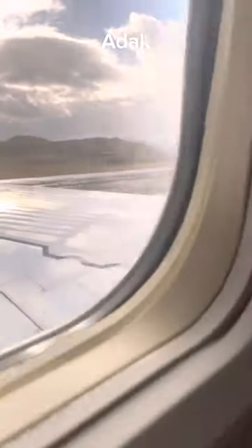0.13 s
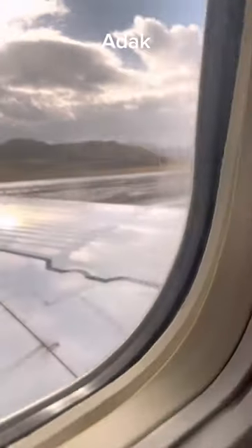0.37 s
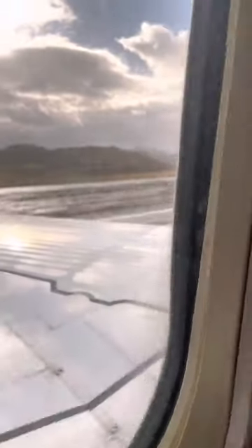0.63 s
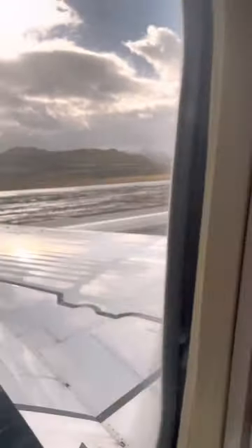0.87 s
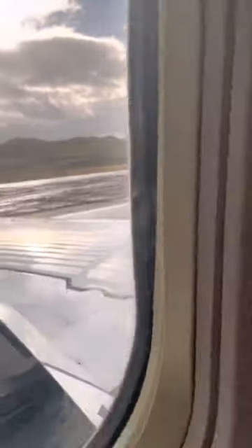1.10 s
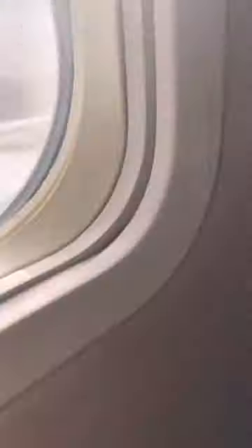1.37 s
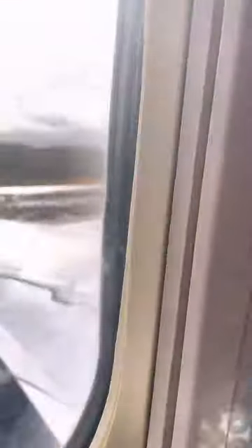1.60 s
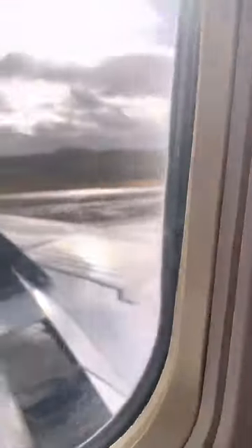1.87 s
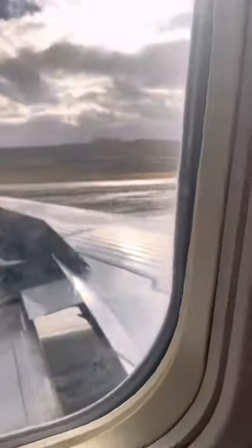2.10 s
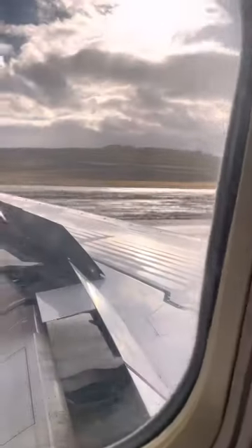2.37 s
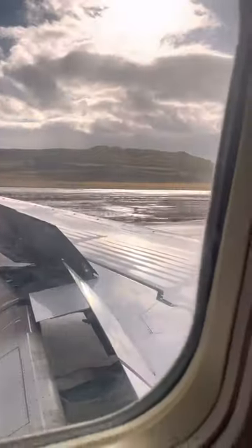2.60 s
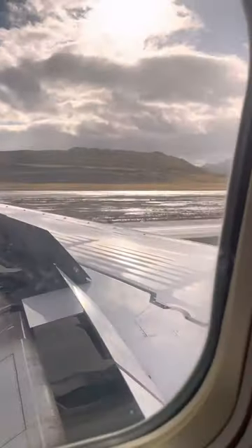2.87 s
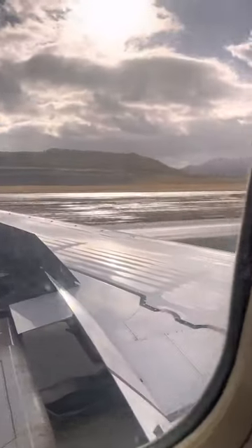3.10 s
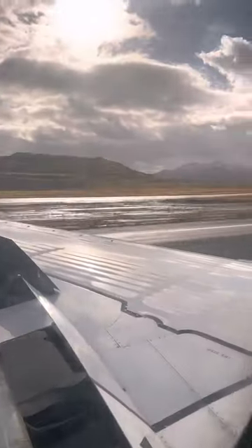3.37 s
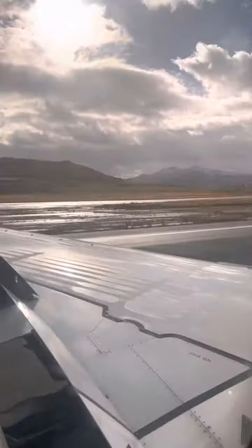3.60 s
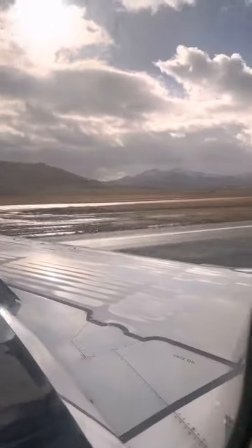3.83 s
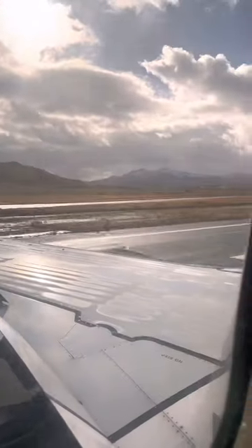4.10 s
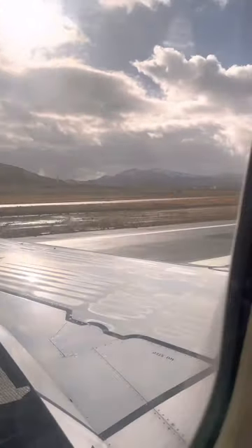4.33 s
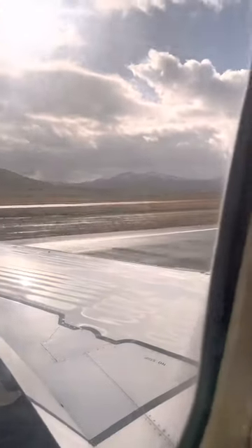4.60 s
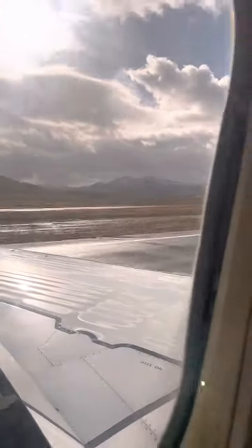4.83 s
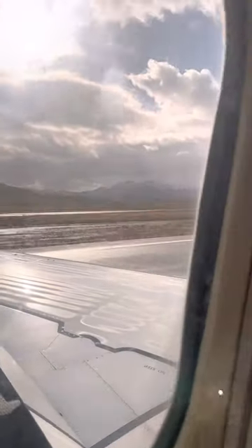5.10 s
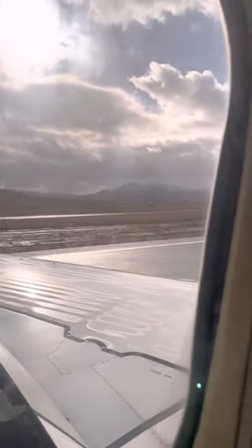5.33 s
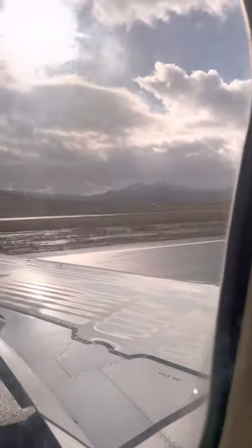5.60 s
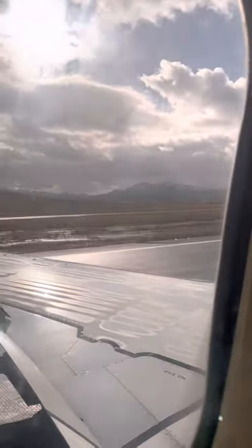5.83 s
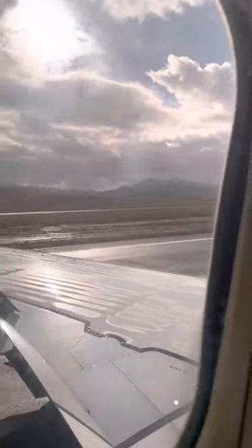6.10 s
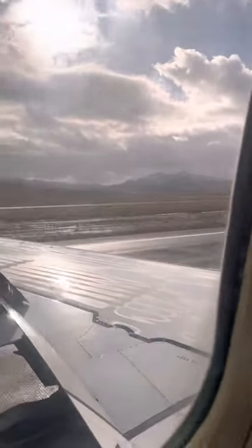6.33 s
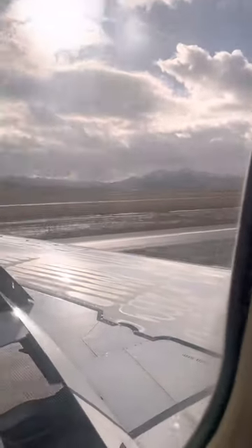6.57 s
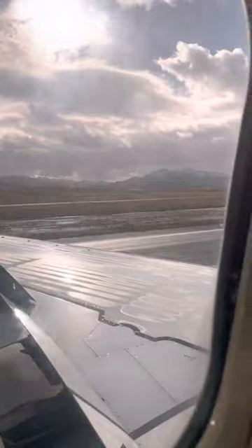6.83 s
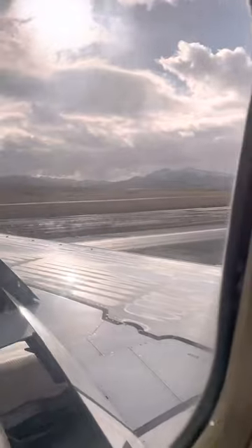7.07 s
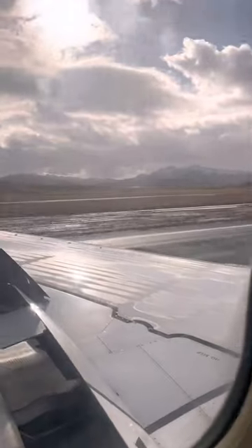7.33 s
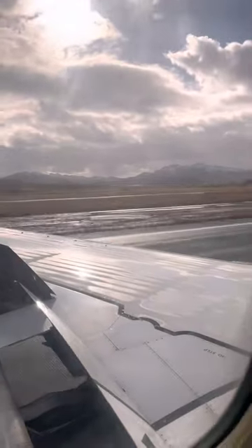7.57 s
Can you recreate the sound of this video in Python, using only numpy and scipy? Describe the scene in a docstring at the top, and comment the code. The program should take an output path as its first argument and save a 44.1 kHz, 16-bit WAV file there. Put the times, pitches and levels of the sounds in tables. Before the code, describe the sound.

Inside an airliner cabin just after touchdown, heavy wheel rumble and rattling panels give way to a swelling reverse-thrust roar with airy hiss.

```python
"""Airliner cabin after touchdown

By the wing, the wheels rumble and boom as shaped noise and sing in tones locked to their falling turn rate.
A touchdown shudder, then reverse thrust, lifts the roar; the hull buffets, a drone builds and air hisses, all noise.
Cabin panels knock as struck modes, trim and latches tick in bright bursts, and one thin squeak sounds.
The two channels are alike to a degree that varies with frequency, and a phone limits the loud peaks."""
import sys
import numpy as np
from scipy import signal
from scipy.fft import rfft, irfft
from scipy.io import wavfile
from scipy.ndimage import uniform_filter1d, minimum_filter1d

SR = 44100
rng = np.random.default_rng(int(sys.argv[2]) if len(sys.argv) > 2 else 0)


def int16_out(signal):
    """Quantize to a 16-bit WAV file."""
    q = np.round(np.clip(np.atleast_2d(signal).T, -1, 1) * 32767)
    wavfile.write(sys.argv[1], SR, q.astype(np.int16))


def invert_db(level):
    """Linear amplitude ratio for a level in decibels (20 dB per decade), elementwise."""
    return 10 ** (np.asarray(level, dtype=float) / 20)


N = 339570  # samples, 7.7 s

# stereo likeness and lag as heard in the finished sound:
# frequency_hz, likeness (0-1), right_lag_rad, left_over_right_db
STEREO_FIELD = [(50, 1, 0, 0), (120, .9992, 0, 0), (200, .995, 0, .3), (340, .95, .1, 1.4),
                (520, .6, .3, 4.6), (700, .2, 0, 5), (1100, .2, 1.7, 2.8), (1800, .55, .4, .4),
                (2700, .2, 2.8, -.9), (4800, .1, 0, 0), (5500, .65, .3, .8), (8000, .65, 2.2, -.2),
                (9000, .9, np.pi, 0), (9500, .96, np.pi, 0), (10000, 1, np.pi, 0), (11400, 1, np.pi, 0),
                (12100, .55, 4.2, 0), (13300, .6, 5.1, 0), (14300, 1, 2 * np.pi, 0)]


def read(points, hz, axis=1):
    """Interpolates a table column on a logarithmic frequency axis."""
    table = np.array(points)
    return np.interp(np.log(hz + 1), np.log(table[:, 0] + 1), table[:, axis])


def evened(x):
    """Normalises the mean power: rms 1."""
    return x / np.sqrt(np.mean(x ** 2) + 1e-20)


def wander(hz):
    """Low-pass filtered noise: slow, smooth chance up to about hz, rms 1."""
    lowpass = signal.butter(3, hz, fs=SR, output="sos")
    return evened(signal.sosfilt(lowpass, rng.standard_normal(N)))


def stereo(left, other, hz, share=1):
    """Partial coherence: spectra (bins x frames) of two channels from a shared and an unrelated field."""
    like, lag, tilt_db = (read(STEREO_FIELD, hz, axis=k)[:, None] for k in (1, 2, 3))
    like = np.clip(share * like, 0, 1)
    shared = like * left * np.exp(-1j * lag)
    unrelated = np.sqrt(1 - like ** 2) * other
    right = shared + unrelated
    return np.array([left * invert_db(tilt_db / 2), right * invert_db(-tilt_db / 2)])


def noise(colour, level_db, patchy_db, flicker_db, size):
    """Random short-time spectra: coloured noise with drifting patches and a flicker shared by all bins."""
    hz, frames = np.fft.rfftfreq(size, 1 / SR), 4 * N // size + 5
    a, b, c, d, patches = rng.standard_normal((frames, len(hz), 5)).T
    patches = uniform_filter1d(patches, size=10, axis=0)  # smooth over frequency
    patches = evened(uniform_filter1d(patches, size=10, axis=1))  # and over time
    flicker = evened(uniform_filter1d(rng.standard_normal(frames), size=4))
    shape = invert_db(read(colour, hz)[:, None] + patchy_db * patches + flicker_db * flicker)
    spectra = stereo(a + 1j * b, c + 1j * d, hz) * shape
    x = signal.istft(spectra, nperseg=size, noverlap=3 * size // 4)[1][:, :N]
    return evened(x) * invert_db(level_db)


def level(rest_db, lift_db, air_db):
    """Common drive: a layer's level in dB rises from rest with a common lift and the airflow."""
    # what drives the steady layers: time_s,
    # common_lift (0-1: touchdown shudder at first, reverse thrust from about 3 s),
    # airflow through vents and gaps (0-1)
    drive = [(0, 0, 0.4), (.15, 0.2, 0.4), (.42, 0.9, 0.9), (.56, .2, 0.2), (.8, 0.3, 0), (1.2, 0.12, 0.2),
             (1.9, 0.11, 0.26), (2.5, 0.6, .3), (2.8, 0.5, .1), (3.099, 0.7, .45), (3.45, 0.93, 0.3),
             (4.302, 1, 0.34), (5, 0.95, 0.5), (5.5, 0.96, 0.43), (6.202, 0.54, 0.55), (6.65, 0.4, 0.81),
             (7.049, 0.2, 0.56), (7.7, 0.8, 0.4)]
    s, lift, air = np.transpose(drive)
    return np.interp(np.arange(N) / SR, s, rest_db + lift_db * lift + air_db * air)


def rumble():
    """Broadband rolling excitation: low noise whose level swells and dips briefly."""
    # rumble spectrum: frequency_hz, density_db (dB per Hz)
    colour = [(15, -48), (25, -12.5), (37, 1.5), (48, 2.5), (91, 0.5), (119, 0), (150, -2.5), (200, -5),
              (260, -36), (440, -120)]
    # the rumble swells or dips (landing bounces early, chance fluctuation later): time_s, added_db
    surges = [(0.031, 1.5), (.17, 2), (.23, 5.5), (0.269, -8.5), (.33, 9.5), (.39, 5), (.45, 3), (.53, 3),
              (.86, 1), (2.92, -2), (3.83, 1), (3.941, -2), (4.309, 2), (6.21, -4.5), (6.47, 5.5)]
    t, spread_s = np.arange(N) / SR, 0.02
    surge_db = sum(db * np.exp(-.5 * ((t - s) / spread_s) ** 2) for s, db in surges)
    level_db = level(rest_db=-13, lift_db=2.6, air_db=0.14) + surge_db
    return noise(colour, level_db, patchy_db=.5, flicker_db=.5, size=4096)


def boom():
    """Band-shaped random vibration: a low boom above the rumble, driven mainly by the common lift."""
    # boom spectrum: frequency_hz, density_db (dB per Hz)
    colour = [(94, -48.5), (160, -1), (242, -1), (275, -1), (405, -11), (455, -14), (561, -17.5),
              (600, -19.5), (780, -31), (1320, -120)]
    level_db = level(rest_db=-20.5, lift_db=4.5, air_db=0.1)
    return noise(colour, level_db, patchy_db=.5, flicker_db=.5, size=2048)


def roar():
    """Turbulent noise: a mid-band roar that swells with the common lift."""
    # roar spectrum: frequency_hz, density_db (dB per Hz)
    colour = [(250, -32.5), (420, -5), (560, -8), (720, -12), (880, -9), (1050, -10), (1280, -14.5),
              (1380, -17.5), (1700, -35.5), (2210, -60.5), (3740, -120)]
    level_db = level(rest_db=-35.5, lift_db=5.97, air_db=0.091)
    return noise(colour, level_db, patchy_db=.9, flicker_db=.5, size=1024)


def buffet():
    """Turbulent pressure on a shell: air, then reversed exhaust, beats on the hull in its own bands."""
    # buffet spectrum: frequency_hz, density_db (dB per Hz)
    colour = [(150, -120), (300, -32), (450, -5), (620, -1), (720, -2), (780, 0), (860, -7), (970, -10),
              (1030, -4), (1100, -12), (1400, -36), (2400, -120)]
    # buffet strength: time_s, level_db
    strength = [(0, -34), (.6, -33.5), (1.8, -43), (2.9, -50), (3.15, -36), (3.32, -30), (3.6, -27.5),
                (3.95, -28), (4.3, -30), (4.9, -31.5), (5.7, -29.5), (6.3, -31), (7.7, -30.5)]
    level_db = np.interp(np.arange(N) / SR, *np.transpose(strength))
    return noise(colour, level_db, patchy_db=.6, flicker_db=.5, size=1024)


def wheels():
    """Harmonics of rotation: low beats, tread hum and groove whine are multiples of the wheel turns."""
    # ground speed as wheel rotation: time_s, turns_per_s
    speed = [(0, 20.1), (.8, 19.75), (1.6, 19.15), (2.8, 18.52), (4, 17.9), (5.2, 17.37), (5.7, 17.08),
             (6.3, 16.64), (7.2, 15.94), (7.7, 15.54)]
    turns = np.cumsum(np.interp(np.arange(N) / SR, *np.transpose(speed))) / SR
    beats = sum(tone(turns, k, swells(k), waver_db=1.5, drift_rad=.3) for k in (3, 4, 6))
    hum = sum(tone(turns, k, swells(k), waver_db=3, drift_rad=.8) for k in (27, 36, 42, 54, 63))
    whine, overtone = (tone(turns, k, swells(72), waver_db=3, drift_rad=1.3) for k in (72, 144))
    # side tones three turns away from the whine
    flanks = sum(tone(turns, k, swells(72), waver_db=3.5, drift_rad=2.5) for k in (69, 75))
    return beats + hum + whine + invert_db(-8.5) * overtone + invert_db(-11.5) * flanks


def tone(turns, k, gain, waver_db, drift_rad):
    """Phase-locked sine on multiple k of a rotation, wavering in level and phase, apart in the channels."""
    size = gain * invert_db(waver_db * wander(14)) * np.sqrt(2)
    phase = 2 * np.pi * (k * turns + rng.random()) + drift_rad * wander(11)
    mean_hz = np.array([k * turns[-1] * SR / N])
    lag, tilt_db = read(STEREO_FIELD, mean_hz, axis=2), read(STEREO_FIELD, mean_hz, axis=3)
    left = np.sin(phase) * invert_db(tilt_db / 2)
    right = np.sin(phase - lag) * invert_db(-tilt_db / 2)
    return size * np.array([left, right])


def swells(k):
    """Amplitude envelope of multiple k: bell-shaped swells over a steady beat."""
    # out-of-round wheels beat on in the background: turn_multiple, level_db
    steady = [(3, -25.5), (4, -20.5), (6, -28)]
    # a wheel tone swells and dies (3-6 beats, 27-63 tread hum under braking, 72 groove whine):
    # middle_s, length_s, turn_multiple, middle_level_db
    passing = [(1.196, 0.56, 4, -31.5), (1.991, 0.85, 3, -23), (2.926, 0.58, 4, -21), (4.294, 0.81, 6, -22),
               (5.2, 5.7, 3, -26.5), (6.006, 2.1, 4, -23.5), (6.854, 1.6, 3, -16), (7.592, 1.5, 6, -21),
               (5.625, 1, 27, -31.5), (6.293, 1.4, 27, -33), (7.136, 0.27, 27, -28), (7.7, 0.15, 27, -26.5),
               (5.501, 1.1, 36, -34.5), (6.8, 0.5, 42, -39), (5.694, 0.27, 54, -41), (7.8, .6, 54, -55),
               (5.6, 0.32, 63, -34.5), (6.3, 0.51, 63, -49), (0.947, 0.19, 72, -45), (1.303, .3, 72, -47),
               (1.66, 0.55, 72, -43.5), (2.04, 0.38, 72, -40.5), (2.474, 0.37, 72, -46),
               (2.83, 0.19, 72, -37.5), (3.12, 0.2, 72, -38.5), (3.448, 0.33, 72, -50),
               (5.502, 0.22, 72, -50), (6.744, 0.63, 72, -44.5)]
    t, edge_db = np.arange(N) / SR, -4.5  # edge_db: either end of the length against the middle
    bells = []
    for s, length, multiple, db in passing:
        if round(multiple) == k:
            bell_db = db + edge_db * (2 * (t - s) / length) ** 2
            bells.append(invert_db(np.maximum(bell_db, -120)))
    return np.max(bells, axis=0) + sum(invert_db(db) for multiple, db in steady if round(multiple) == k)


def panels():
    """Partial coherence of paths: knocks are as alike in both channels as the noise, near ticks less so."""
    near_likeness = .82
    hz, _, z = signal.stft(np.array([[knocks(), knocks()], ticks()]), SR, nperseg=1024)
    both = stereo(*z[0], hz) + stereo(*z[1], hz, share=near_likeness)
    return signal.istft(both, SR, nperseg=1024)[1][:, :N]


def ring(modes, jolt, detune):
    """Modal synthesis: a short force excites the decaying modes of a panel; peak 1."""
    t = np.arange(SR // 8) / SR
    body = np.zeros(len(t))
    for (hz, db, t60), d in zip(modes, detune):
        body += invert_db(db - 60 * t / t60) * np.sin(2 * np.pi * hz * d * t)
    x = signal.fftconvolve(jolt, body)[:len(t)]
    return x / abs(x).max()


def knocks():
    """Impact on several bodies: a jolt chatters on a small panel, then a large one, trim and airframe ring."""
    # jolts: start_s, small_panel_db, large_panel_db (against the small), airframe_thud_db,
    # lining_cutoff_hz (the soft lining dulls the small panel and trim above it)
    jolts = [(0.157, -35, 19, -24, 2500), (0.2131, -15, 9.5, -22, 3580), (0.231, -26, -18, -15, 3200),
             (0.282, -33, 7, -33, 3000), (0.303, -21.5, 7, -29, 2600), (0.396, -24, 7, -30, 3500),
             (0.4011, -13, 10, -12.5, 3800), (0.469, -25.5, 9.5, -15, 2400),
             (0.5199, -13, 3.5, -12.5, 4230), (0.86, -22, 4, -25, 2380), (0.870, -22, 0, -19.5, 1700),
             (0.953, -22, -3, -27.5, 2400), (0.961, -28.5, 9, -19, 2350), (1.028, -25, -6, -24, 4500),
             (1.059, -27, -17, -17.5, 2400), (1.082, -29, -16, -32, 2390), (1.112, -19.5, -15, -20, 4000),
             (1.17, -28.5, 7, -21, 2300), (3.291, -23.5, -12, -4, 4300), (7.477, -16.5, -9, -29, 3400),
             (7.483, -21.5, -8, -31, 2020)]
    # modes of the small panel: frequency_hz, level_db, t60_s
    small_modes = [(1450, -4, 0.018), (1750, -11, 0.016), (2180, -1, 0.022), (2520, 0, 0.026),
                   (2850, -12, 0.014), (3150, -3, 0.018), (3550, -4, 0.016), (4150, -9, 0.02)]
    # modes of the large panel: frequency_hz, level_db, t60_s
    large_modes = [(890, 0, 0.026), (1095, -1, 0.018)]
    # modes of loose trim: frequency_hz, level_db, t60_s
    loose_modes = [(2170, -13, 0.0084), (2430, 6.5, 0.016), (2860, 4, 0.014), (3100, 0.5, 0.015)]
    # modes of the airframe thud: frequency_hz, level_db, t60_s
    thud_modes = [(80, -6.5, 0.043), (119.8, -7, 0.26), (170, -23, 0.074)]
    loose_db, loose_fade_s = -7, 0.018  # level against the small panel, time constant
    out, t = np.zeros(N + SR), np.arange(SR // 12) / SR
    chatter = (t / .002) ** 2 * np.exp(-t / .002)
    late = np.pad(signal.windows.hann(SR // 1500), (SR // 200, 0))  # one soft blow 5 ms later
    # the heavy panel swings up softly inside this band
    large_band = signal.butter(2, (760, 1280), "band", fs=SR, output="sos")
    for s, db, low_db, thud_db, top_hz in jolts:
        white = rng.standard_normal((2, len(t)))
        detune = rng.uniform(0.98, 1.02, size=12)
        buzz = white[1] ** 3 * np.exp(-t / loose_fade_s) * np.minimum(t / 0.01, 1)
        small = ring(small_modes, chatter * white[0], detune)
        trim = small + invert_db(loose_db) * ring(loose_modes, buzz, detune)
        trim = signal.sosfilt(signal.butter(6, top_hz, fs=SR, output="sos"), trim)
        large = signal.sosfilt(large_band, ring(large_modes, late, detune))
        thud = ring(thud_modes, chatter, detune)
        hit = invert_db(db) * (trim + invert_db(low_db) * large) + invert_db(thud_db) * thud
        out[round(s * SR):][:len(hit)] += hit
    return out[:N]


def snap(white, t60, tilt_db):
    """Impulsive broadband radiation: a bright filtered burst with a faint cabin tail; peak 1."""
    # tick spectrum: frequency_hz, density_db (dB per Hz)
    colour = [(1200, -6), (3500, 10), (6500, 13), (10000, 3), (14000, 1.5), (17000, -13.5)]
    t, hz = np.arange(len(white)) / SR, np.fft.rfftfreq(len(white), 1 / SR)
    octaves = np.log2(np.clip(hz, 1000, 16000) / 6000)
    x = irfft(rfft(white) * invert_db(read(colour, hz) + tilt_db * octaves), len(white))
    decay = invert_db(-60 * t / max(t60, .008)) + 0.18 * invert_db(-60 * t / 0.21)
    x = x * decay * np.minimum(t / 0.00031, 1)
    return x / abs(x).max()


def ticks():
    """Point events in time: listed ticks, a random rattle of small ones and one thin squeak."""
    # bright ticks of trim and latches: start_s, peak_db, t60_s, brightness_db_per_octave
    listed = [(0.2286, -29, 0.063, 2), (0.284, -34.5, 0.042, 4), (0.3268, -25, 0.012, -3.5),
              (0.39, -23, 0.04, -1), (1.03, -28.5, 0.034, 0), (1.057, -36, 0.05, 0.5),
              (1.074, -32.5, 0.043, -8), (1.0842, -24.5, 0.029, 5), (1.1154, -25, 0.044, 1.5),
              (1.297, -37, 0.039, -3.5), (1.487, -41, 0.057, 4), (1.65, -33, 0.06, 2),
              (1.6904, -36, 0.081, 5), (1.804, -32.5, 0.04, 1), (1.987, -31.5, 0.03, 3.5),
              (2.441, -36.5, 0.04, 0), (3.2942, -28.5, 0.03, -2), (4.0994, -33.5, 0.02, -5.5),
              (4.3288, -40, 0.026, 5), (5.692, -36, 0.028, 2), (7.4814, -26.5, 0.068, -6)]
    rattle_per_s, rattle_db = 24, -56  # rattle_db: the smallest ticks
    out = np.zeros((2, N + SR))
    sizes = invert_db(rattle_db + 2.9 * np.minimum(rng.exponential(1, N), 4))
    sizes = sizes * (rng.random(N) < rattle_per_s / SR)
    which = rng.integers(0, 8, N)  # each small tick takes one of eight waveforms
    for path in out:
        for s, db, t60, tilt_db in listed:
            path[round(s * SR):][:SR // 8] += invert_db(db) * snap(rng.standard_normal(SR // 8), t60, tilt_db)
        for k in range(8):
            small = snap(rng.standard_normal(SR // 8), .02, tilt_db=4.0)
            path[:N] += signal.oaconvolve(sizes * (which == k), small)[:N]
    at, count = round(.11 * SR), round(.05 * SR)  # squeak start and length
    out[:, at:at + count] += squeak(count)
    return out[:, :N]


def squeak(count):
    """Narrow-band noise: a thin high squeak that fades from its start."""
    centre_hz, width_hz = 12900, 500
    edges_hz = [centre_hz - width_hz, centre_hz + width_hz / 2]
    band = signal.butter(2, edges_hz, "band", fs=SR, output="sos")
    thin = evened(signal.sosfilt(band, rng.standard_normal((2, count))))
    fade = signal.windows.tukey(count, .1) * np.linspace(1, 0, count) ** 2
    return invert_db(-41) * thin * fade


def drone():
    """Band-limited noise: a drone that builds steadily as the brakes bite."""
    # drone spectrum: frequency_hz, density_db (dB per Hz)
    colour = [(700, -18.5), (1100, -6.5), (1500, 4.5), (2000, 1.5), (2600, 2.5), (3200, -4), (4200, -10.5),
              (5500, -25), (9000, -81.5)]
    build_db_per_s = 0.4
    level_db = level(rest_db=-44, lift_db=2.27, air_db=3.2) + build_db_per_s * np.arange(N) / SR
    return noise(colour, level_db, patchy_db=1, flicker_db=.5, size=512)


def hiss():
    """Turbulent flow noise: air hisses through vents and gaps, its level following the airflow."""
    # hiss spectrum: frequency_hz, density_db (dB per Hz)
    colour = [(2500, -14), (4000, 0), (5500, -1), (8000, -3.5), (10200, -6.5), (11500, -10.5), (14000, -13),
              (15500, -16.5), (16200, -30)]
    level_db = level(rest_db=-55.5, lift_db=0.1, air_db=15.2)
    return noise(colour, level_db, patchy_db=1.5, flicker_db=1, size=512)


def scene():
    """Linear superposition of all sources in the cabin."""
    return rumble() + boom() + roar() + buffet() + wheels() + panels() + drone() + hiss()


def roll_off(x):
    """The treble ends steeply here."""
    return signal.sosfilt(signal.butter(12, 15880, fs=SR, output="sos"), x)


def record(dry):
    """Dynamic range control: the microphone drops the deepest bass, a fast limiter and a soft knee follow."""
    dry = invert_db(1.0) * signal.sosfilt(signal.butter(2, 38, "high", fs=SR, output="sos"), dry)
    peak_db = 20 * np.log10(abs(dry).max(0) + 1e-9)
    # the gain recovers 200 dB a second; it starts to fall 1 dB under full scale
    fall = np.arange(N) * 200. / SR
    over_db = np.maximum(np.maximum.accumulate(peak_db + fall) - fall + 1, 0)
    ahead_db = -minimum_filter1d(-over_db, size=257)  # the largest excess within 128 samples either way
    smooth_db = uniform_filter1d(uniform_filter1d(ahead_db, size=129), size=129)
    held = dry * invert_db(-.8 * smooth_db)
    ceiling = .97
    rounded = held / (1 + (held / ceiling) ** 8) ** (1 / 8)
    rounded = rounded * np.minimum(np.arange(N)[::-1] / 128, 1)  # short fade at the very end
    return roll_off(rounded)


dry = scene()
out = record(dry)
int16_out(out)
```